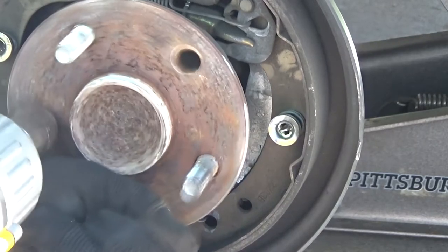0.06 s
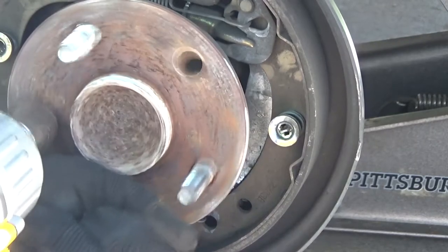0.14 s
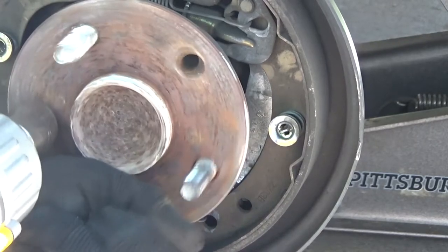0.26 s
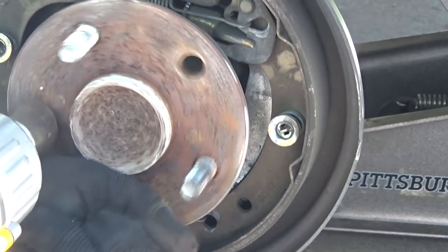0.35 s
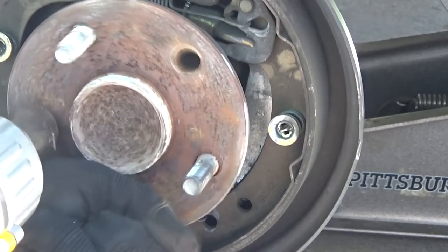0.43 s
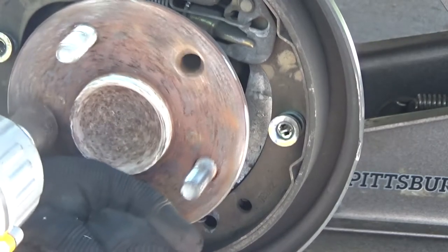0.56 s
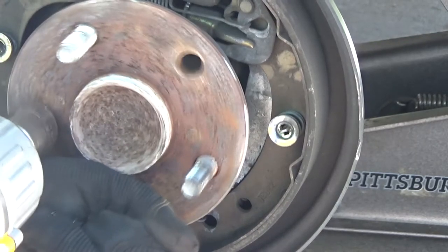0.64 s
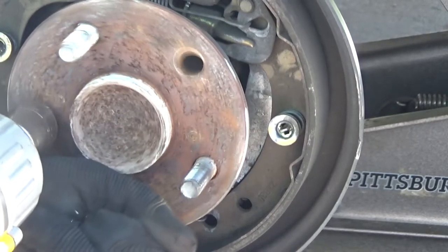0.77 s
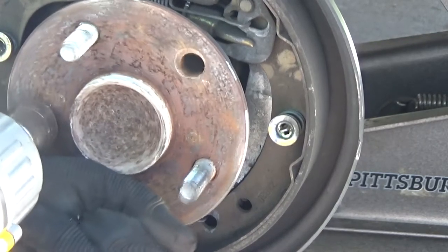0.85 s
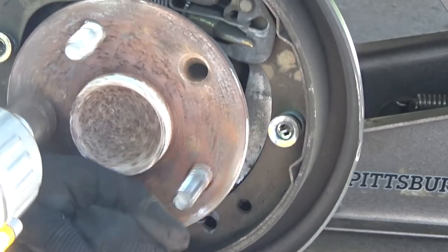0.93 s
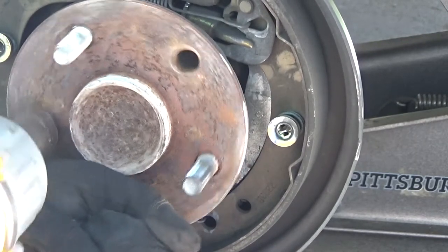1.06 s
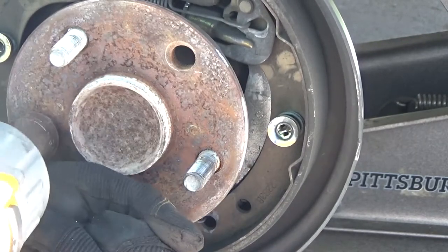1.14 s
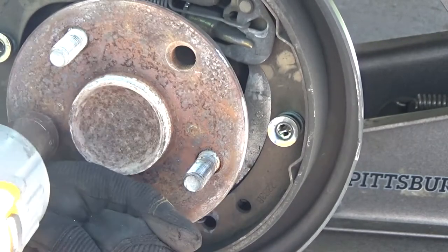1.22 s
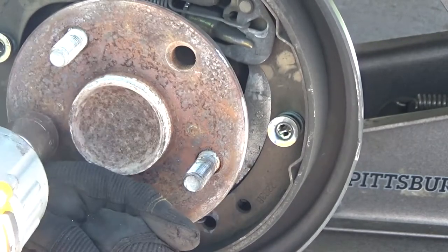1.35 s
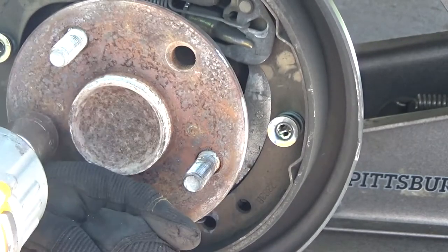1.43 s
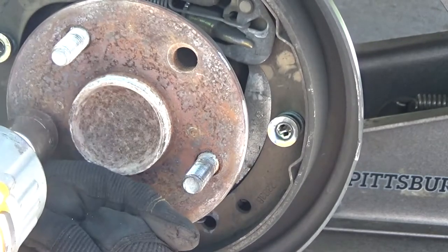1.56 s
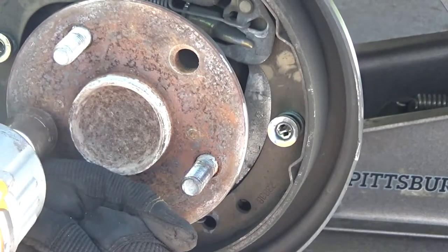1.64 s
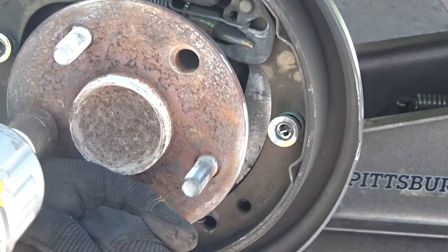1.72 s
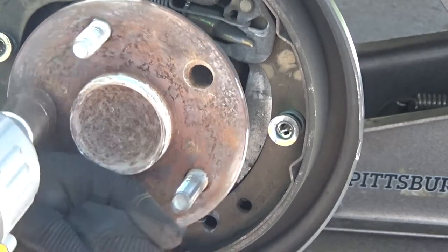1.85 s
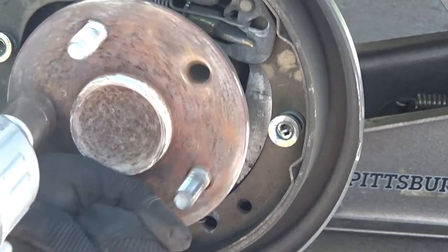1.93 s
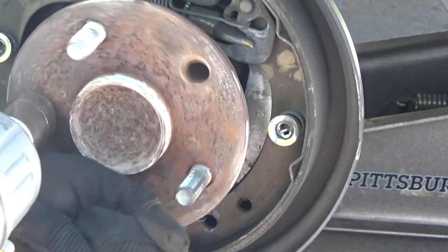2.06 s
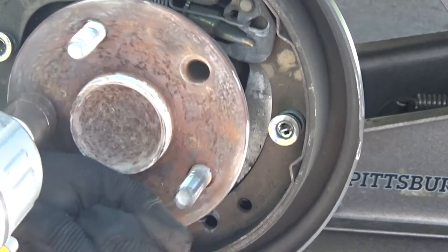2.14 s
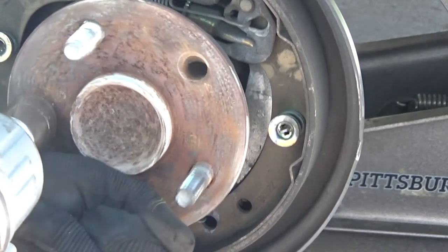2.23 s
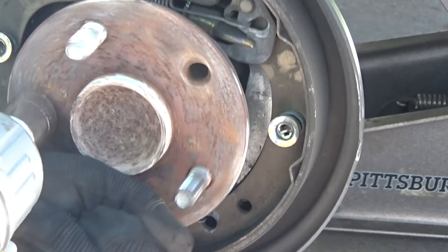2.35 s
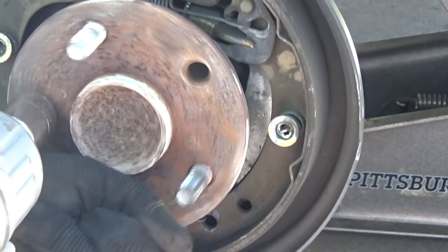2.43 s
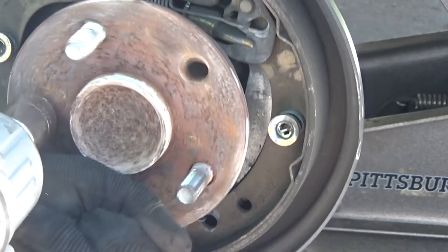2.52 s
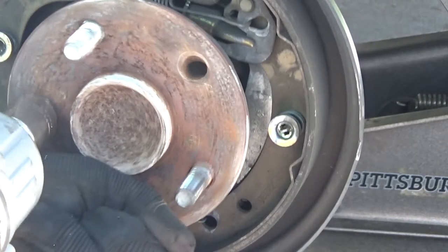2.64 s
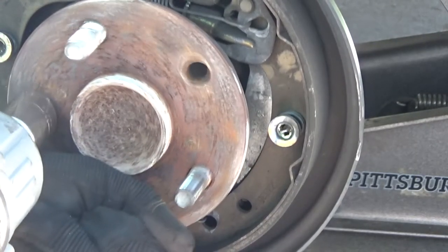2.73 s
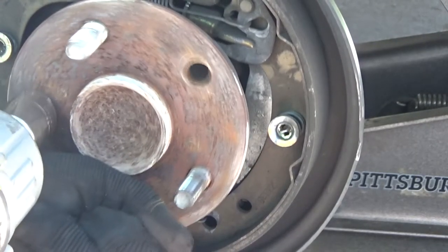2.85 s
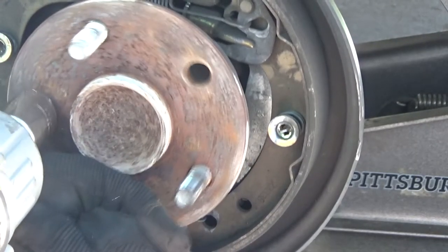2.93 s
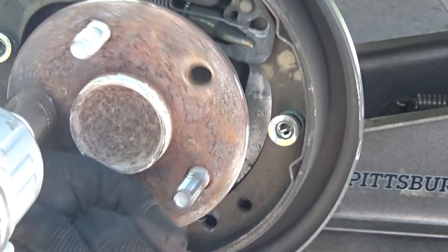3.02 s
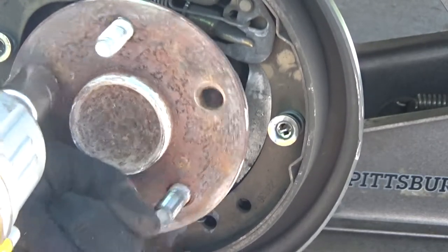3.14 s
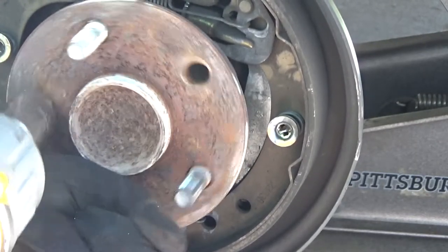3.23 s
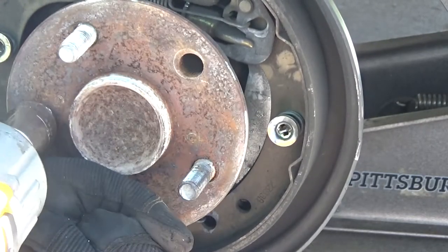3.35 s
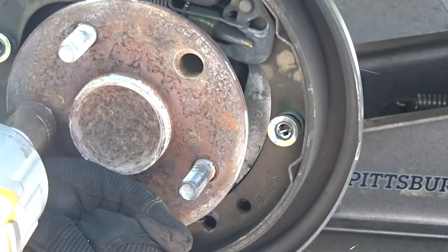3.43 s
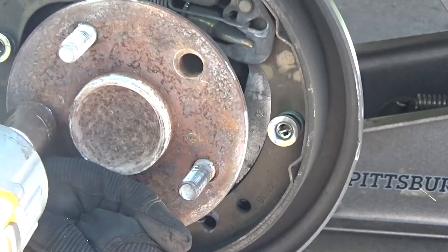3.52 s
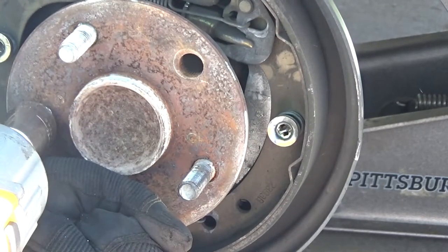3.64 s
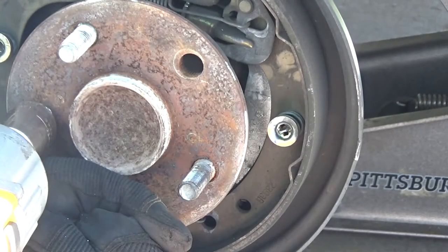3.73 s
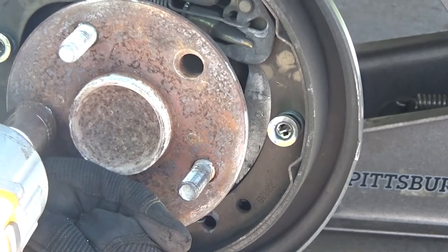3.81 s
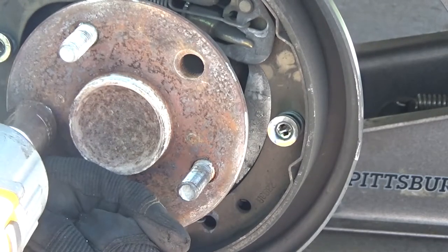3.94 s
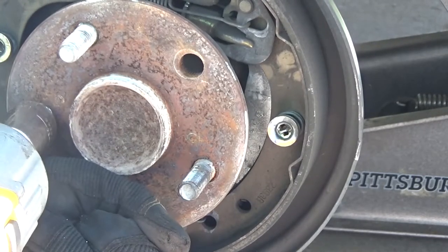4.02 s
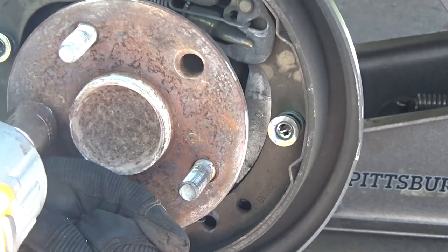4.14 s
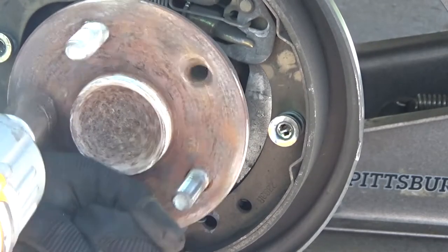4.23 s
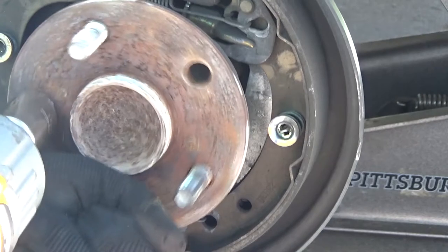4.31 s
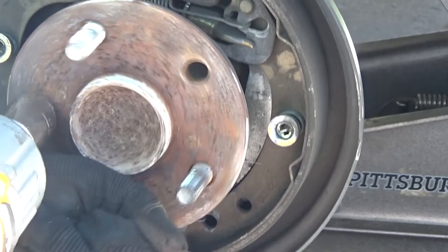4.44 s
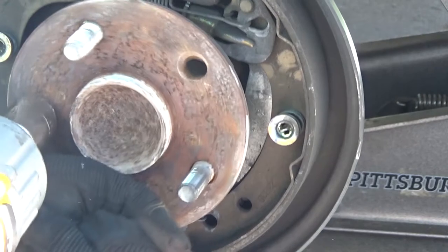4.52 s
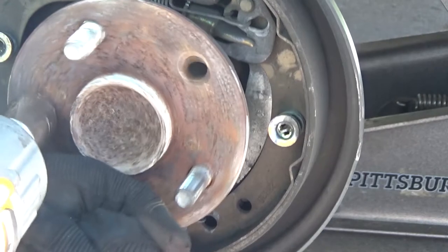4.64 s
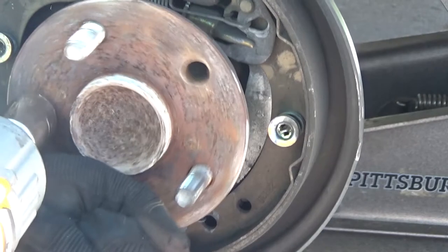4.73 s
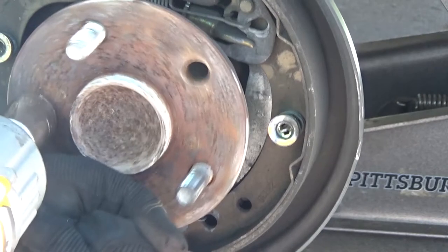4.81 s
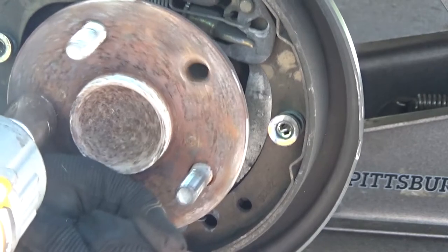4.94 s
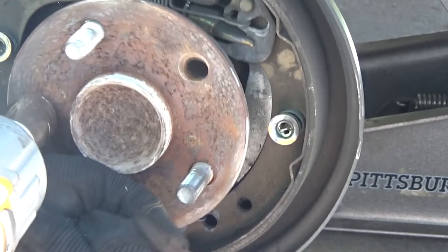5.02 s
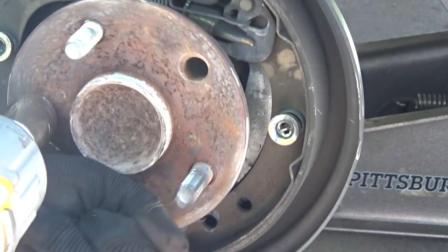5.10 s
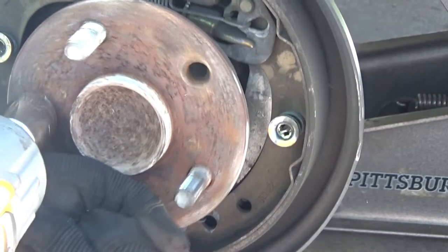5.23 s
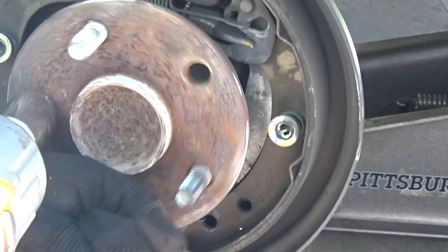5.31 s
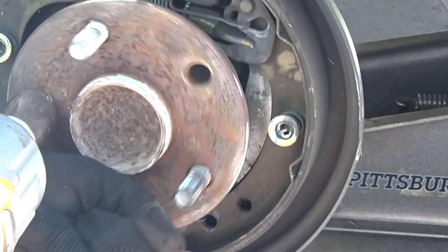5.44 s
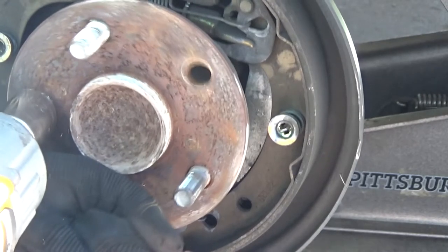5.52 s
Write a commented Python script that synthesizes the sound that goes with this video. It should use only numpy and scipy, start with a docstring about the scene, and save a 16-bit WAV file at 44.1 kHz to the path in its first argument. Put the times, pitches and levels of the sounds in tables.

```python
"""Hammering first, already under way: an impact wrench draws a wheel stud into a steel hub, close by, in a garage.
In three runs two lugs strike the anvil in turn, about 38 blows a second: noise with tuned peaks for the clang of
socket, hub and drum, decaying sines for the socket's ring. After the first two the hammer rattles to rest and the
hub rings on; the third never stops. Behind: motor whirr, ticks, the garage's echo, a far hum and air.
Two closely spaced microphone ports; a limiter holds the peaks down."""
import sys
import numpy as np
from scipy import signal
from scipy.fft import rfft, irfft, next_fast_len
from scipy.io import wavfile
from scipy.ndimage import uniform_filter1d, minimum_filter1d

SR = 44100
rng = np.random.default_rng(int(sys.argv[2]) if len(sys.argv) > 2 else 0)


def store_wav(level_fs):
    """Save 16-bit WAV to argv[1]."""
    pcm = np.round(np.clip(np.atleast_2d(level_fs), -1, 1) * 32767)
    wavfile.write(sys.argv[1], SR, pcm.T.astype(np.int16))


N = 245637

# the runs: trigger pulled t/s, blow level/dB (relative), motor level/dB,
# first lug's favour of the socket's ring/dB (the second lug gets the opposite)
RUNS = [(-.1, -20, -22.5, 1.5), (1.755, -21, -25, 2.5), (4.163, -22, -24.5, -6)]
# hammer speed, one curve per run, first full blow to last: t/s, rate/blows per s
BLOW_RATE = [
    [(0.0104, 39.04), (.25, 38.38), (.62, 39.02), (.85, 38.39), (1.03, 38.64)],
    [(1.8099, 35.65), (1.89, 38.63), (2.0, 39.03), (2.75, 37.88), (3.18, 37.56)],
    [(4.2229, 35.36), (4.28, 38.52), (4.45, 38.18), (5.0, 38.03), (5.35, 37.46), (5.57, 38.11)],
]
# as the stud draws in, the steel changes colour: t/s, drum's boom level/dB, mid clang level/dB
STEEL_COLOUR = [(0.01, -3.5, 2), (.42, -2.5, 2.5), (.6, -0.5, -14), (1.03, 1.5, -6), (1.85, 1.5, 2.5),
                (2.2, 0, -1.5), (2.8, -2.5, 0.5), (3.18, 1, -2), (4.25, 1, 2.5), (4.7, -3.5, 0.5),
                (5.2, -4, 4.5), (5.55, -3, 3)]
# how squarely the socket sits on the nut, heard in its ring; one curve per run: t/s, level/dB (relative)
SOCKET_SEAT = [
    [(0.01, -26), (0.282, -27), (0.316, -33), (0.428, -23), (0.626, -34), (1.01, -32), (1.02, -29)],
    [(1.81, -27), (1.97, -35), (2.008, -22), (2.176, -30), (2.812, -29), (3.038, -34), (3.18, -26)],
    [(4.25, -32), (4.278, -23), (4.386, -32), (4.408, -23), (4.824, -27), (5.114, -25), (5.55, -29)],
]
# the socket's modes: f/Hz, level/dB (relative), t60/s
SOCKET_MODES = [(3411, 0, .065), (3745, -10, .04)]
BLOW_SPREAD_DB, RING_SPREAD_DB = .6, 2.2   # chance from blow to blow
USUAL_SEAT_DB, SOCKET_OVER_DB = -28, 0.5   # at the usual seat the ring's drive is this far over the blow
PERIOD_S = 1 / 38   # nominal time between blows


def hammering(body, blow_db=10.5, lug_own=0.12, radiate_hz=1500):
    """The two lugs alternate; each shakes the steel slightly differently and rings the socket by its own amount."""
    steel, socket = 0, 0
    runs = [blow_times(rate) for rate in BLOW_RATE]
    lopsided = steel_response()   # the part of the motion that flips with each half turn
    for lug, sign in enumerate([1, -1]):
        blows = []
        for run_times, (_, run_db, _, run_favour) in zip(runs, RUNS):
            blows += [(s, run_db, run_favour) for s in run_times[lug::2]]
        times, db, favour = np.transpose(blows)
        db = db + blow_db + BLOW_SPREAD_DB * rng.standard_normal(len(times))
        boom, clang = curve(STEEL_COLOUR, times)
        force = contacts(times, db + clang, boom - clang, -clang)   # the crack stays as it is
        # lug_own: the share of energy that is the lug's own
        response = np.sqrt(1 - lug_own) * body + sign * np.sqrt(lug_own) * lopsided
        steel = steel + convolve(force * np.sqrt(PERIOD_S * SR), response)
        seat_db = curve(np.vstack(SOCKET_SEAT), times)[0] - USUAL_SEAT_DB
        ring_db = db + SOCKET_OVER_DB + seat_db + sign * favour
        for hz, mode_db, t60 in SOCKET_MODES:
            chance_db = RING_SPREAD_DB * rng.standard_normal(len(times))
            socket = socket + struck(times, ring_db + mode_db + chance_db, hz, t60)
    return steel + butter(socket, radiate_hz, "high")   # the small socket radiates no bass


def blow_times(run, jitter_s=.00009):
    """A lug meets the anvil at every half turn of the hammer."""
    s = np.arange(run[0][0], run[-1][0], 1 / SR)
    half_turns = np.cumsum(curve(run, s)[0]) / SR
    times = np.interp(np.arange(int(half_turns[-1]) + 1), half_turns, s)
    return times + rng.normal(0, jitter_s, len(times))


# the dense, short clang of tool, hub and drum: f/Hz, level/dB per Hz (relative)
CLANG = [(30, -49.5), (110, -32), (190, -15.5), (300, -18), (500, -3.5), (900, 1), (1030, -4.5), (1250, 0),
         (1900, 3), (3000, 3), (5900, -2), (10600, 0.5), (12000, -11), (16000, -26)]
# how long the clang lasts: f/Hz, t60/s
CLANG_T60 = [(100, .12), (700, 0.21), (2000, 0.088), (5000, 0.084), (9000, 0.041), (15000, .055)]
# steel resonances that stand out of the clang: f/Hz, width/Hz, level above the clang/dB
STEEL_PEAKS = [(775, 8.3, 8.5), (1158, 66, 8), (1624, 50, 8.5), (2052, 32, 8.5), (2250, 35, 1),
               (3385, 45, 11.5), (3682, 42, 7), (4930, 45, 6), (5494, 45, 6.5), (6430, 12, 10),
               (7030, 70, 4.5), (8860, 90, 6), (8720, 90, 3.5), (10260, 130, 6.5), (10600, 100, 2.5),
               (12700, 70, 15), (15000, 80, 5)]
# the anvil's own brief crack: f/Hz, level/dB per Hz (relative)
CRACK = [(100, -49), (2000, -15.5), (6000, -9.5), (8500, -5), (11000, -7.5), (12500, -14.5), (16000, -13)]
# how long the crack lasts: f/Hz, t60/s
CRACK_T60 = [(2000, 0.027), (15000, .018)]


def steel_response(crack_db=-7.0):
    """One blow close up: a bright crack over the dense clang with its steel resonances."""
    crack = from_db(crack_db) * dense_ring(CRACK, CRACK_T60)
    return crack + dense_ring(CLANG, CLANG_T60, STEEL_PEAKS)


def contacts(times, db, boom_db, crack_db, scrape_db=-3.5, scrape_s=.0024, scrape_hz=4000, size=512):
    """Force of steel on steel: a click and a brief scrape, new each time, with its own share of lows and highs."""
    t = np.arange(size) / SR
    scrape = rng.standard_normal((len(times), size)) * np.exp(-t / scrape_s)
    scrape = butter(scrape, scrape_hz, "high", order=1)
    scrape = scrape / np.linalg.norm(scrape, axis=1, keepdims=True)
    force = (t == 0) + from_db(scrape_db) * scrape
    force = force + (from_db(boom_db) - 1)[:, None] * butter(force, 1100, "low", order=1)
    force = force + (from_db(crack_db) - 1)[:, None] * butter(force, 4400, "high", order=1)
    out = np.zeros(N + size)
    for s, push in zip(times, force * from_db(db)[:, None]):
        start = int(np.clip(s * SR, 0, N))
        out[start:start + size] += push
    return out[:N]


# glancing blows as the hammer catches or lets go: t/s, level/dB (relative), crack level/dB (relative)
GLANCES = [(1.041, 6, -19), (1.048, 7, 1), (1.76, -17, -7.5), (1.778, -13, 8.5), (1.797, -1.5, -12.5),
           (3.194, 4, -26), (3.204, 1, -9), (4.191, 1, -19), (4.197, -9, -13), (4.213, 6, -17)]


def glances_and_rattle(body):
    """The hammer catches or lets go with glancing blows, then rattles to rest: light contacts of the same steel."""
    rows = GLANCES + rattle()
    return light_hits(rows, body, level_db=13.5, boom_db=-6.5, crack_db=-3.0, damp_t60=0.064)


# the hammer let go: release t/s, gap to first touch/s, first touch level/dB (relative)
RELEASES = [(1.048, .0215, -7.5), (3.203, .0206, -10)]
RATTLE_SHRINK_S = .0016   # each gap is this much shorter than the last
RATTLE_FADE_DB_PER_S, RATTLE_CRACK_DB = 103, -8.5


def rattle(count=8):
    """The lugs run down over the anvil, ever sooner and softer, as rows like those of GLANCES."""
    rows = []
    for release, gap, db in RELEASES:
        delays = np.cumsum(gap - RATTLE_SHRINK_S * np.arange(count))
        rows += [(release + s, db - RATTLE_FADE_DB_PER_S * (s - gap), RATTLE_CRACK_DB) for s in delays]
    return rows


def light_hits(rows, body, level_db, boom_db, crack_db, damp_t60):
    """Light touches of the same steel, which die sooner than a full blow."""
    times, db, crack = np.transpose(rows)
    force = contacts(times, db + level_db, np.full(len(times), boom_db), crack + crack_db)
    return convolve(force, body * fade(np.arange(body.shape[1]) / SR, damp_t60))


# the freed hub: f/Hz, t60/s, level/dB at first release, level/dB at second (both relative)
HUB_MODES = [(399, 2.5, -64, -70), (608, .93, -51, -58), (1260, .86, -43, -37), (1367, 1.15, -41, -48),
             (1604, .8, -54, -56), (2176, .85, -45, -66), (3661, .75, -58, -53), (8327, .68, -50, -51),
             (8333, .68, -44, -45)]
# the slack socket chinks on the nut: t/s, level/dB (relative)
CHINKS = [(3.326, -29), (3.356, -30), (3.368, -33)]
# modes of each chink: f/Hz, level/dB (relative), t60/s
CHINK_MODES = [(2620, 2, 0.038), (2800, -12, .04), (5460, -5.5, 0.019)]


def after_ring(hub_db=1.0):
    """Once the load is off, the hub sings and the socket chinks: free decay of their modes."""
    times, db = np.transpose(CHINKS)
    releases = [s for s, _, _ in RELEASES]
    hub = sum(struck(releases, levels, hz, t60) for hz, t60, *levels in HUB_MODES)
    chinks = sum(struck(times, db + mode_db, hz, t60) for hz, mode_db, t60 in CHINK_MODES)
    return from_db(hub_db) * hub + chinks


# the whirr of motor and gears: f/Hz, level/dB per Hz (relative)
MOTOR_COLOUR = [(60, -20), (400, -9.5), (1000, -5.5), (2200, 3), (5000, -3.5), (10000, -5.5), (16000, -21)]
# the motor drive's whine: f/Hz, level/dB
WHINE = [(3950, -60.5), (7900, -59.5)]
WHINE_S, SPIN_UP_S = 0.023, 0.04   # length of the whine; time for motor and gears to reach speed
COAST_DB, COAST_S, BRAKE_DB_PER_S = -35.5, 0.11, 499   # let go, they coast and are braked


def motor(t):
    """At each pull the drive whines and the gears whirr up; let go, they coast until the brake bites."""
    whirr, whining = 0, 0
    let_go_times = [s for s, _, _ in RELEASES] + [np.inf]   # the last run goes on
    for (pulled, _, db, _), let_go in zip(RUNS, let_go_times):
        speed = np.clip((t - pulled) / SPIN_UP_S, 0, 1)
        coasting_db = COAST_DB - BRAKE_DB_PER_S * np.maximum(t - let_go - COAST_S, 0)
        whirr = whirr + speed ** 2 * from_db(np.where(t < let_go, db, coasting_db))
        whining = whining + (t > pulled) * (t < pulled + WHINE_S)
    whine = sum(from_db(db) * np.sin(2 * np.pi * hz * t) for hz, db in WHINE)
    return whirr * noise(MOTOR_COLOUR, N) + whining * whine


# trigger and loose socket between the runs: t/s, level/dB (relative), crack level/dB (relative)
TICKS = [(1.3624, -40.5, -35), (1.6794, -51, -14.5), (1.699, -40.5, -27), (1.7144, -44, -12),
         (3.5824, -46, -20), (4.1195, -36, -28)]


def ticks(body):
    """Trigger and loose socket tick between the runs, as light contacts through the same steel response."""
    return light_hits(TICKS, body, level_db=6.0, boom_db=14.0, crack_db=10.0, damp_t60=0.061)


# the garage's echo: f/Hz, level/dB per Hz (relative)
ROOM = [(60, -7.5), (500, 13), (2000, 9.5), (5000, 0), (10500, -9.5), (13000, -24.5)]
# how long the echo lasts: f/Hz, t60/s
ROOM_T60 = [(100, 0.91), (1000, 0.34), (4000, 0.5), (9000, 0.52), (15000, 0.61)]


def garage(x, room_db=-21.0, build_s=0.0017, size=44100):
    """The echo builds up as the sound reaches the walls."""
    build = 1 - np.exp(-np.arange(size) / SR / build_s)
    return from_db(room_db) * convolve(x.mean(0), dense_ring(ROOM, ROOM_T60, size=size) * build)


# a far machine's hum lines: f/Hz, level/dB (relative)
HUM = [(199.2, -9.5), (226.5, -1.5), (400, -11), (452.5, -12), (829, -9), (910, -10)]
# the hum over time: t/s, level/dB
HUM_DB = [(0, -64), (1.7, -85), (3.2, -63.5), (3.6, -65), (4.1, -66.5), (5.57, -66)]
# garage air: f/Hz, level/dB per Hz (relative)
AIR = [(25, -24), (80, -7), (200, -2.5), (500, -4.5), (1300, -7.5), (2500, -17.5), (6000, -24.5),
       (10500, -29.5), (13000, -40), (16000, -50.5)]
# the air over time: t/s, level/dB
AIR_DB = [(0, -60.5), (1.7, -68.5), (3.6, -64.5), (4.1, -68), (5.57, -63)]


def background(t):
    """Garage air as coloured noise, and a far machine's hum as sines whose pitch wavers together."""
    waver = np.interp(t, np.linspace(0, t[-1], num=40), rng.normal(0, .007, size=40))
    clock = t + np.cumsum(waver) / SR
    hum = 0
    for hz, db in HUM:
        hum = hum + np.sqrt(2) * from_db(db) * np.sin(2 * np.pi * (hz * clock + rng.random()))
    air = noise(AIR, N)
    return from_db(curve(HUM_DB, t)[0]) * hum + from_db(curve(AIR_DB, t)[0]) * air


def microphones(x, narrow_hz=380, side_db=-2.0, balance_db=-0.35):
    """Two closely spaced ports hear the same bass and differ only higher up."""
    side = from_db(side_db) * butter((x[0] - x[1]) / 2, narrow_hz, "high")
    return (x.mean(0) + side * [[1], [-1]]) * from_db([[balance_db / 2], [-balance_db / 2]])


def limiter(x, ceiling_db=-4.0, release_db_per_s=395.5, ahead_s=0.0025):
    """The gain ducks just ahead of each peak over the ceiling and recovers at a steady rate in dB."""
    t, ahead = np.arange(N) / SR, max(int(ahead_s * SR), 2)
    over = np.maximum(20 * np.log10(np.abs(x).max(0) + 1e-9) - ceiling_db, 0)
    over = -minimum_filter1d(-over, ahead, origin=-(ahead // 2))   # look ahead
    held = np.maximum.accumulate(over + release_db_per_s * t) - release_db_per_s * t
    return x * from_db(-uniform_filter1d(held, ahead // 2 + 1))


def struck(times, db, hz, t60):
    """One mode, set ringing at the given times: a two-pole resonator fed with clicks."""
    clicks = np.zeros(N)
    clicks[np.clip(np.asarray(times) * SR, 0, N - 1).astype(int)] = from_db(db)
    r, w = fade(1 / SR, t60), 2 * np.pi * hz / SR
    return signal.lfilter([0, np.sin(w)], [1, -2 * r * np.cos(w), r * r], clicks + 1e-18)


def dense_ring(colour, t60s, resonances=(), size=8192):
    """Countless modes struck at once, as noise: each band dies at its own rate."""
    t, hz = np.arange(size) / SR, np.fft.rfftfreq(size, 1 / SR)
    whole, out = rfft(noise(colour, size)), 0
    centres = np.geomspace(100, 16000, 9)
    for centre, share in zip(centres, np.eye(len(centres))):
        decay = fade(t, at_hz(t60s, centre))
        band = irfft(whole * at_hz(np.c_[centres, share], hz), size)
        out = out + band * decay / np.linalg.norm(decay)
    return evened(out, colour, resonances)


def evened(x, colour, resonances, width_hz=45):
    """Bring a response to an even colour with resonant peaks, by a causal (minimum-phase) filter; energy 1."""
    size = x.shape[1]
    whole, hz = rfft(x), np.fft.rfftfreq(size, 1 / SR)
    peaks = 1   # in power
    for centre, width, db in resonances:
        peaks = peaks + (from_db(2 * db) - 1) / (1 + (2 * (hz - centre) / width) ** 2)
    power = uniform_filter1d(np.mean(np.abs(whole) ** 2, 0), max(int(width_hz * size / SR), 1))
    gain = from_db(at_hz(colour, hz)) * np.sqrt(peaks / (np.abs(power) + 1e-18))
    cepstrum = irfft(np.log(gain), size)
    causal = 2 * cepstrum * (np.arange(size) < size // 2)   # folded forward in time
    out = irfft(whole * np.exp(rfft(causal)), size)
    return out / np.sqrt(np.sum(out ** 2) / 2)


# how much noise differs between the two channels: f/Hz, side minus mid level/dB, ahead of the microphones
SIDE = [(100, -36.5), (250, -25.5), (500, -19.5), (1200, -16), (5000, -17), (9000, -22), (13000, -44.5)]


def noise(colour, size):
    """Coloured stereo noise of rms 1, nearly alike in both channels."""
    length = next_fast_len(size)
    hz = np.fft.rfftfreq(length, 1 / SR)
    mid, side = np.exp(2j * np.pi * rng.random((2, len(hz)))) * from_db(at_hz(colour, hz))
    stereo = mid + side * from_db(at_hz(SIDE, hz)) * [[1], [-1]]
    x = irfft(stereo, length)[:, :size]
    return x / x.std()


def from_db(db):
    """Decibels to gain."""
    return 10 ** (np.asarray(db) / 20)


def curve(rows, s):
    """Each column of a time table, read at the times s."""
    knots, *columns = np.transpose(rows)
    return [np.interp(s, knots, c) for c in columns]


def at_hz(points, hz):
    """A spectrum table, read on a log-frequency axis."""
    knots, values = np.array(points)[:, 0], np.array(points)[:, 1]
    return np.interp(np.log(np.maximum(hz, 1)), np.log(knots), values)


def butter(x, hz, kind, order=2):
    """Causal low- or high-pass."""
    return signal.sosfilt(signal.butter(order, hz, kind, fs=SR, output="sos"), x + 1e-18)


def convolve(x, response):
    """Play x through a response, keeping the scene's length."""
    return signal.oaconvolve(np.atleast_2d(x), np.atleast_2d(response), axes=-1)[:, :N]


def fade(t, t60):
    """Free decay, 60 dB in t60."""
    return np.exp(-np.log(1000) * t / t60)


def scene():
    """The wrench at work close by, its echo in the garage and the background."""
    t = np.arange(N) / SR
    body = steel_response()
    wrench = hammering(body) + glances_and_rattle(body) + motor(t) + ticks(body)
    return wrench + garage(wrench) + after_ring() + background(t)


def record(dry):
    """Picked up by the microphones, peaks are limited and the top is cut."""
    top_cut = signal.ellip(12, .1, 80, 15800, fs=SR, output="sos")   # ripple dB, stopband dB, edge Hz
    return signal.sosfilt(top_cut, limiter(microphones(dry)))


dry = scene()
out = record(dry)
store_wav(out)
```